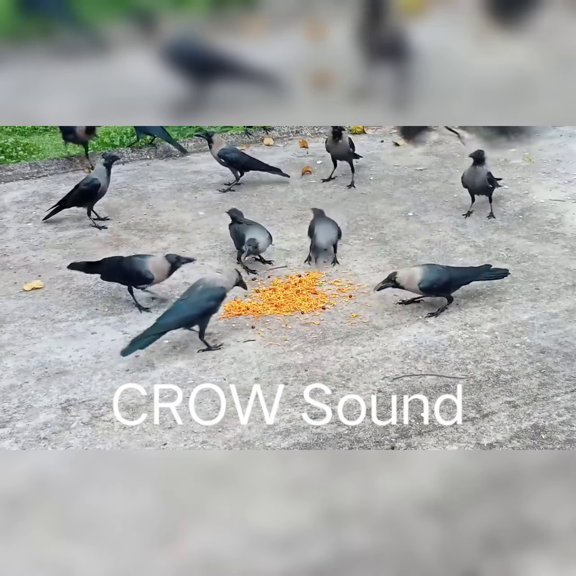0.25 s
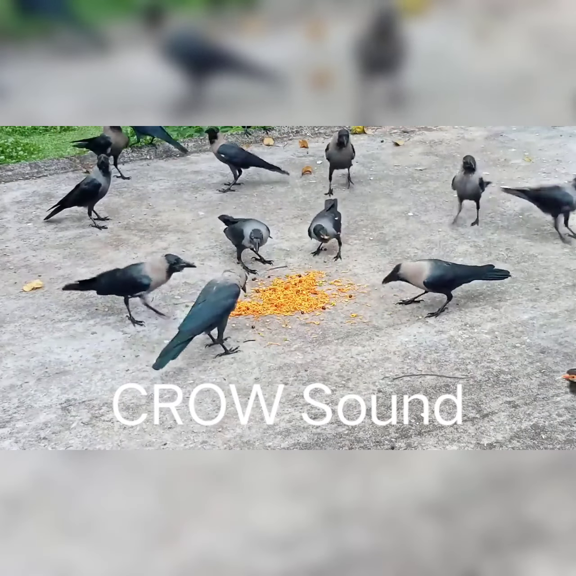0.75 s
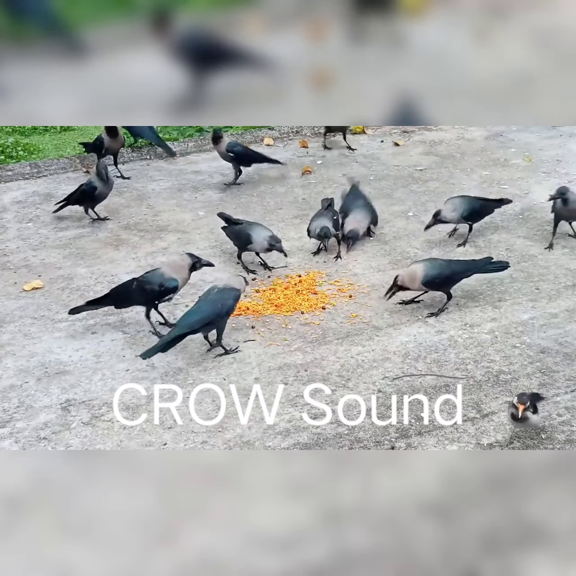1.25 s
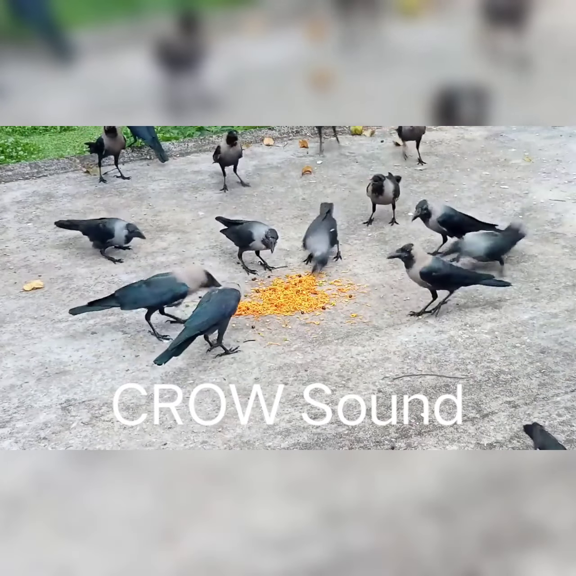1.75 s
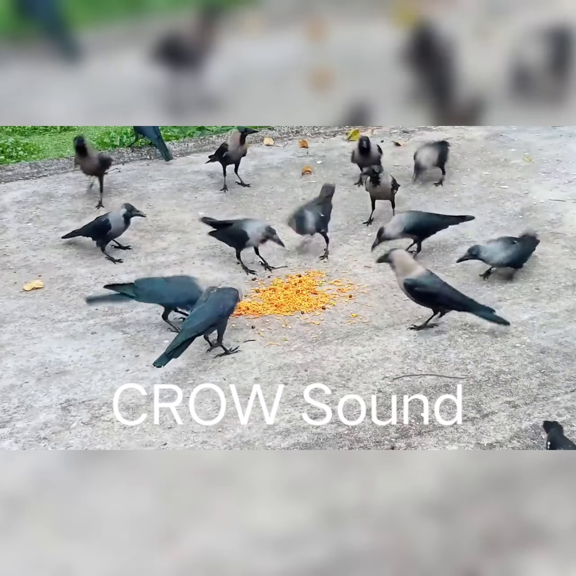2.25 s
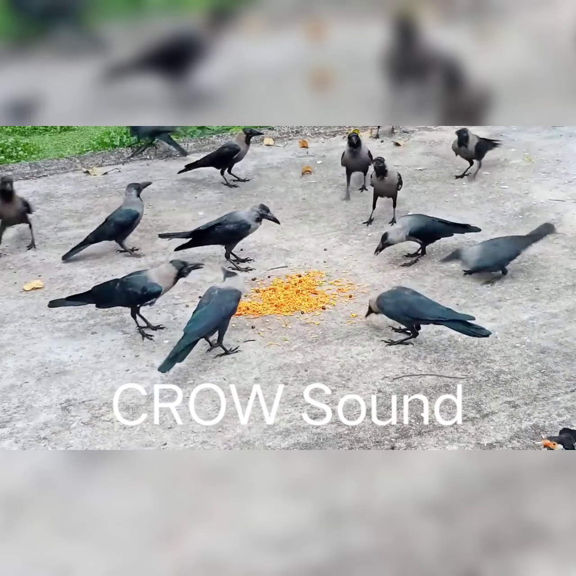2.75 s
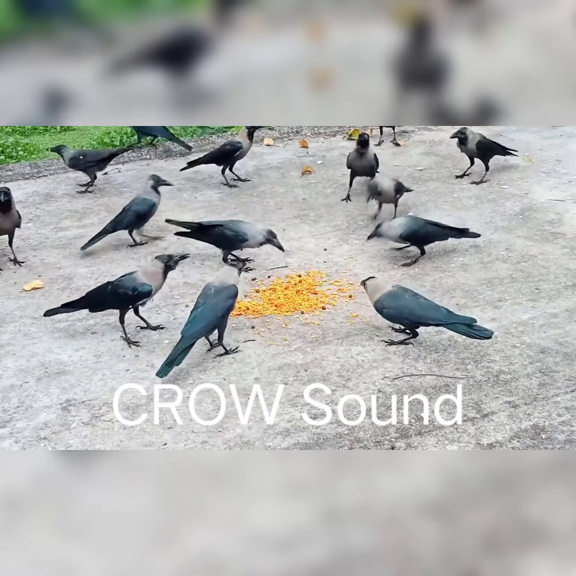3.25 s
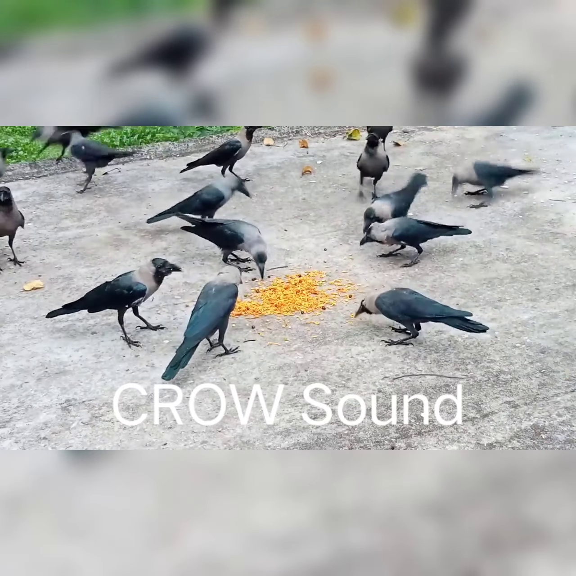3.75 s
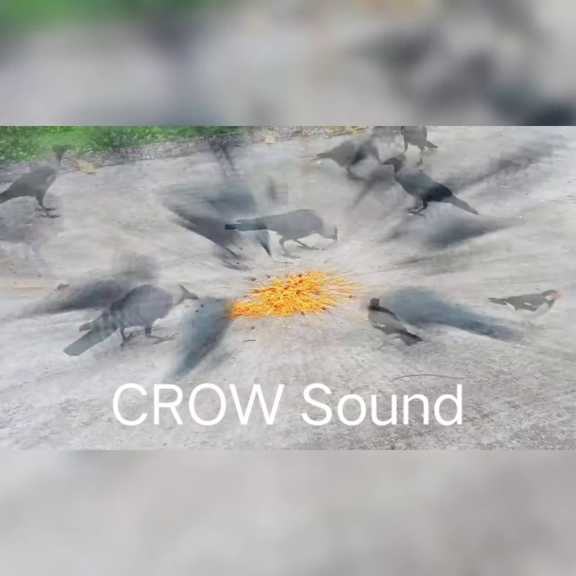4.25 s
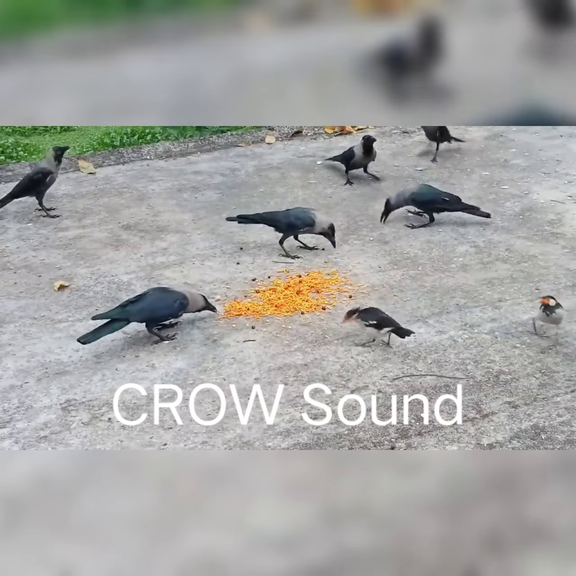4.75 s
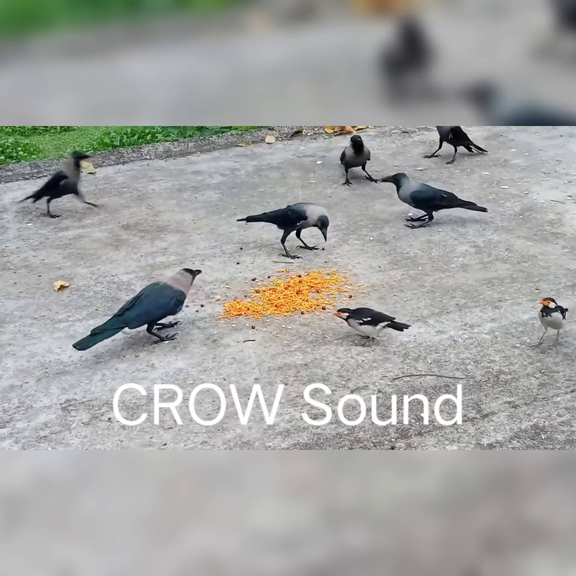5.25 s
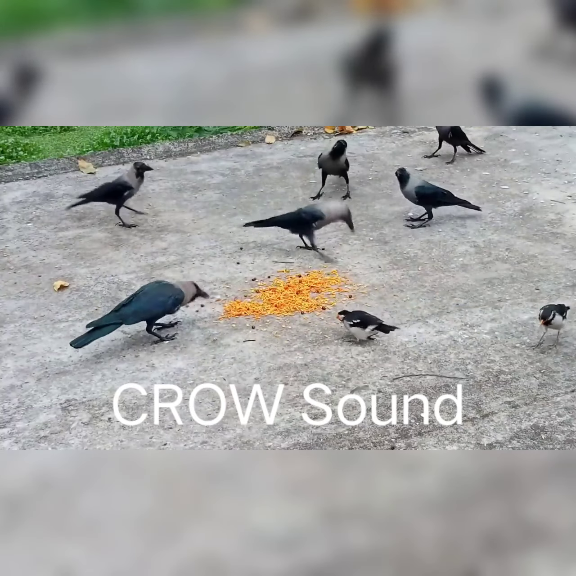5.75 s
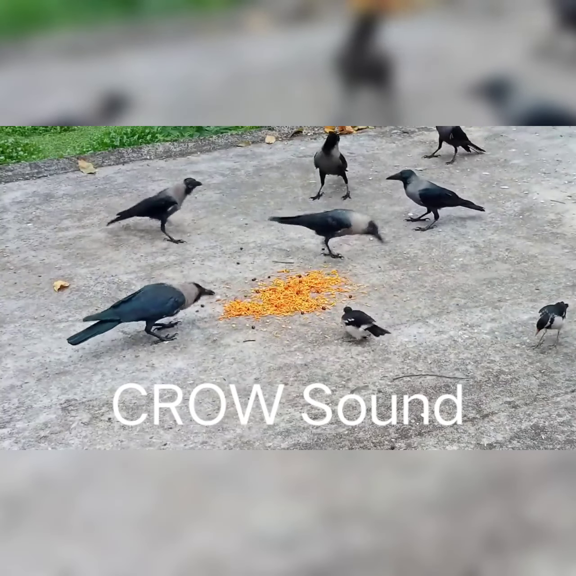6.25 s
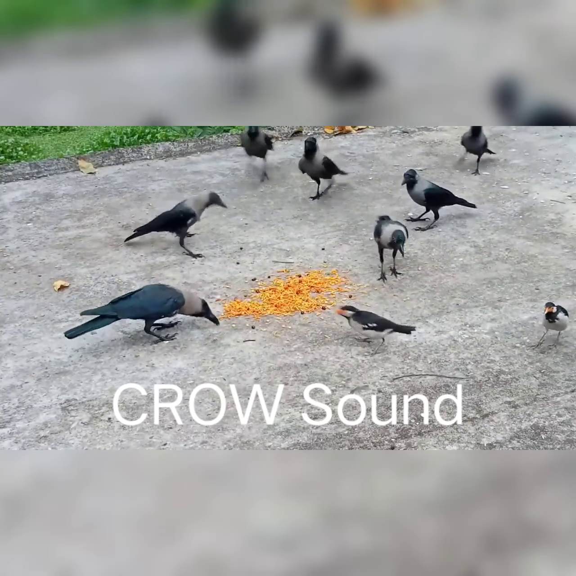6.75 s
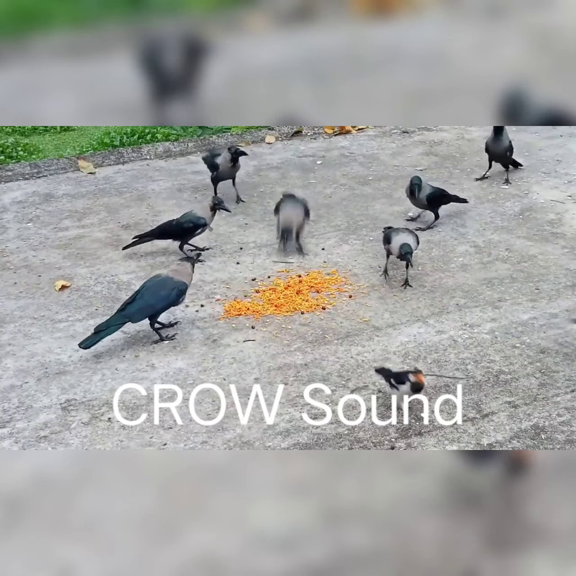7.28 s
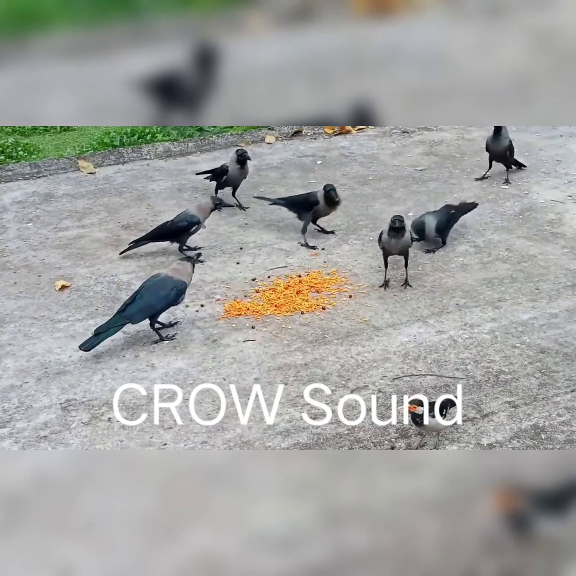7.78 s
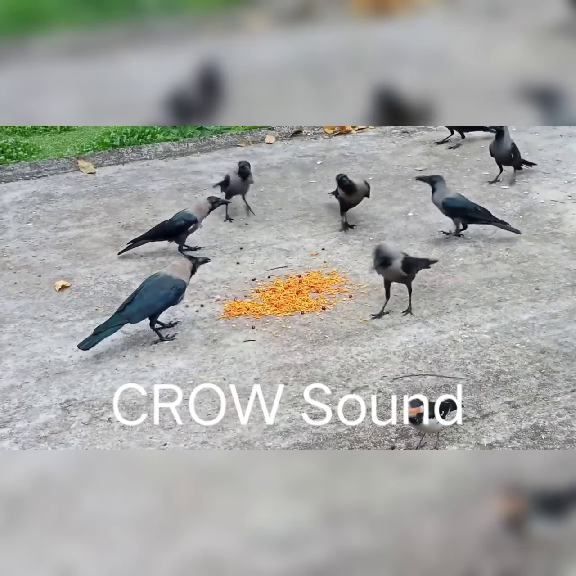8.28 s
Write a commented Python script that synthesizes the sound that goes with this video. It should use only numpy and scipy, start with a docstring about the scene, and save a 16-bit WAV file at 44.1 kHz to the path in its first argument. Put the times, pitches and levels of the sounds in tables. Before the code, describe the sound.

Raspy mid-pitched crow caws crowd together in an open yard, then grow sparse, over quiet outdoor air, small ground ticks and distant bird chirps.

```python
"""Crows squabbling over food

House crows squabble on a concrete yard, cawing harshly and over one another. Each caw is an arching tone
shaken by a fast rasp, shaped by throat and beak, and echoed by the yard. Beaks and claws tap the ground as
short ringing noise bursts, far birds chirp and hoot as gliding whistles, and coloured noise makes the soft
outdoor background, the twitter in the trees and the puffs of wind that bump the microphone."""
import sys
import numpy as np
from scipy import signal
from scipy.fft import rfft, irfft, next_fast_len
from scipy.io import wavfile
from scipy.ndimage import map_coordinates

SR = 44100
rng = np.random.default_rng(int(sys.argv[2]) if len(sys.argv) > 2 else 0)


def transcribe(signal):
    """Save signal, clipped to [-1, 1], as a 16-bit WAV file at the path in sys.argv[1]."""
    frames = np.atleast_2d(signal).T
    limited = np.clip(frames, -1, 1)
    pcm = np.round(limited * 32767).astype(np.int16)
    wavfile.write(sys.argv[1], SR, pcm)


N = 375732  # length of the scene [samples]

# Every caw: (start [s], end [s], top pitch [Hz], pitch sag [share], level before swell and fade [dB],
#  attack [s], pitch swing of the rasp at the start [share], roughness [0 to 1], beak resonance at top pitch [Hz],
#  throat boost [dB], mouth boost [dB], treble boost at top pitch [dB], twang boost [dB])
CAW_CALLS = [ (-.16, 0.093, 579, .09, -18.5, .034, 0.039, 0.4, 2560, -2, -9, -0.5, -9),
             (-.07, 0.229, 501.4, .13, -23, 0.046, 0.025, 0.37, 1850, 3.5, -9, -5, -7),
             (0.509, 0.832, 544.8, 0.16, -25, 0.064, 0.068, 0.31, 2220, 6.5, 6, -2, 9),
             (1.03, 1.31, 488.7, .10, -26.5, .045, 0.018, 0.31, 1900, 8.5, -4.5, 0.5, 3.5),
             (1.416, 1.737, 445.4, 0.14, -26.5, 0.05, 0.019, 0.46, 2380, -11.5, 1.5, 0, 10),
             (1.619, 1.819, 488, 0.054, -26, 0.053, .025, 0.24, 2290, 0.5, -3, 1.5, -9.5),
             (1.643, 1.94, 576.7, .12, -21, 0.082, 0.056, 0.42, 2500, -5, -10.5, 2.5, -11),
             (1.987, 2.238, 442.6, 0.066, -18.5, .03, 0.041, 0.36, 1740, -0.5, 1.5, 3.5, 8),
             (2.012, 2.287, 513.8, .13, -19.5, .04, .049, 0.44, 1844, 2, -5.5, 0.5, -2.5),
             (2.047, 2.341, 525.7, 0.18, -26, .083, 0.017, 0.42, 2400, -0.5, -35, -6, 10),
             (2.851, 3.137, 550.2, 0.11, -23, .06, 0.056, 0.28, 1867, 5, 5.5, 3, 3),
             (3.73, 4.056, 537.5, 0.21, -17.5, 0.088, 0.054, 0.29, 2260, -2, -12.5, -6, 11.5),
             (4.165, 4.486, 527, 0.11, -38.5, 0.074, 0.0094, 0.7, 2330, -1, 3, -1.5, 4),
             (4.456, 4.623, 542.2, 0.13, -20, 0.003, 0.065, 0.56, 1970, 1, -2.5, 2, 7),
             (4.453, 4.682, 490.5, 0.079, -22.5, .0019, 0.013, 0.4, 2030, 1, -2.5, 1.5, -1),
             (5.03, 5.363, 485, 0.12, -54.5, 0.061, 0.067, 0.53, 1640, 1, 5, -0.5, -2.5),
             (6.087, 6.38, 527.8, 0.095, -21.5, .05, 0.041, 0.37, 1970, 2, -2, 1, 8),
             (7.482, 7.779, 490.6, .12, -36.5, 0.056, 0.042, 0.22, 2000, 6.5, -4.5, 1.5, -1),
             (7.831, 8.163, 531.7, 0.18, -21.5, 0.093, 0.032, 0.3, 2200, -0.5, -13, -0.5, 4.5),
             (7.887, 8.211, 470.5, .11, -22, 0.066, 0.0067, 0.28, 2390, 2.5, -5, 1, 4),
             (8.19, 8.475, 517.3, 0.15, -20.5, .035, 0.082, 0.31, 1913, 1.5, -7.5, -0.5, 0)]
# Tone colour of a crow's throat: (frequency [Hz], gain [dB])
THROAT_COLOUR = [(260, -48.5), (450, -19), (605, -20.5), (790, -15.5), (1030, -7.5), (1270, -5.5),
                 (1760, 0.5), (2040, 0), (2950, -15.5), (3630, -25), (4030, -20), (5030, -33.5),
                 (7070, -19), (10900, -35.5), (15500, -40.5)]
# How much of the voice turns to hiss: (frequency [Hz], share of power [0 to 1])
AIRY_SHARE = [(2500, 0), (4200, .08), (7000, .28), (12000, .55)]
# Tone colour of the early copies off hard surfaces: (frequency [Hz], gain [dB])
BOUNCE_COLOUR = [(1000, -13), (2200, -10), (3500, -4), (8000, -2)]
# How long the yard's echo takes to die by 60 dB: (frequency [Hz], time [s])
ECHO_TIMES = [(300, 0.38), (2000, 0.57), (5000, 0.48), (12000, 0.15)]
# Tone colour of the outdoor background: (frequency [Hz], gain [dB])
AIR_COLOUR = [(18, -50), (30, -32), (102, 0.5), (156, -8.5), (197, -4), (369, -12.5), (518, -16),
              (561, -12.5), (767, -17), (1400, -22.5), (1510, -21), (4310, -31.5), (5310, -51.5),
              (6890, -25), (15500, -48.5)]
# Tone colour of twittering in the trees: (frequency [Hz], gain [dB])
TWITTER_COLOUR = [(2000, -18), (3100, -5.5), (3700, -7), (4500, -19.5), (5500, -20), (9000, -28)]
# Flurries of twitter, before a shared trim: (middle [s], half width [s], peak level [dB])
TWITTER_FLURRIES = [(.2, 0.54, -44.5), (1.9, 0.51, -45.5), (2.45, 0.14, -53), (2.8, 0.1, -56),
                    (3.9, 0.38, -47), (8.5, 0.61, -54.5)]
# Beaks and claws on concrete: (time [s], level before the shared tick and knock trims [dB],
#  extra knock [dB], ring [Hz])
PECK_HITS = [(.177, -24, 6, 3460), (.2523, -34.5, -15, 4000), (.508, -24.5, 4, 3450),
             (.6487, -22, 11.5, 3900), (.8464, -34.5, -13, 3270), (2.3554, -36.5, 2, 3200),
             (2.5045, -23, 4, 3500), (2.5832, -30.5, -33, 3260), (3.4068, -33.5, -17.5, 7870),
             (3.477, -30.5, 3.5, 3460), (3.5189, -35.5, 0.5, 2950), (3.6108, -33.5, 0.5, 7400),
             (4.1515, -27, -33.5, 4360), (4.3834, -27.5, -12, 8100), (5.1848, -29.5, -11, 7170),
             (6.5176, -25.5, 13, 3700), (6.8346, -37.5, -2.5, 3150), (7.1092, -41.5, -20.5, 7350),
             (7.34, -43, 13, 6850)]
# Tone colour of the hard tick: (frequency [Hz], gain [dB])
TICK_COLOUR = [(1470, -29), (2500, -6), (3690, -2.5), (4970, -19), (6950, -0.5), (8880, -9), (10100, -13.5),
               (15500, -11.5)]
# Tone colour of the dull knock: (frequency [Hz], gain [dB])
KNOCK_COLOUR = [(290, -46.5), (500, -13), (884, -9), (1360, -3.5), (2060, 5), (3000, -17.5), (3900, -52.5),
                (6600, -120)]
# Small birds far off: (start [s], end [s], pitch [Hz], glide [share of pitch], level before mixing [dB])
FAR_CHIRPS = [(.245, .43, 3700, -0.13, -65), (.293, .467, 4600, -0.029, -62.5),
              (.46, .521, 3330, -.04, -55), (.642, .675, 3680, -0.067, -50), (.74, .882, 3440, -.06, -51.5),
              (1.262, 1.416, 3235, 0.057, -58), (3.685, 3.768, 3575, 0.1507, -56),
              (4.278, 4.466, 4380, -0.11, -64)]
# Low hoots far off: (start [s], end [s], pitch [Hz], glide [share of pitch], level before mixing [dB])
FAR_HOOTS = [(2.344, 2.622, 790, -0.11, -68.5), (2.641, 2.852, 690, -0.15, -62.5),
             (3.567, 3.798, 705, 0.052, -66.5), (3.938, 4.117, 695, -.08, -60),
             (4.225, 4.393, 620, -0.061, -61.5), (5.502, 5.688, 720, 0.018, -67.5),
             (5.92, 6.132, 800, 0.064, -65.5), (7.088, 7.614, 697, -0.13, -66.5),
             (7.411, 7.47, 965, .17, -66.5)]
# Strength of the breeze at the microphone, before a shared trim: (time [s], level [dB])
BREEZE = [(4.42, -60), (4.55, -40.5), (4.85, -54), (5.12, -29), (5.26, -47), (5.65, -45), (6.02, -55.5),
          (6.6, -46.5), (6.75, -71)]
# Tone colour of the breeze's low eddies: (frequency [Hz], gain [dB])
EDDY_COLOUR = [(15, -47), (25, -30), (54, 3), (97, 8.5), (237, -12.5), (389, -21), (450, -50), (580, -67),
               (990, -120)]
# Sharper puffs, before a shared trim: (middle [s], length [s], level [dB])
WIND_PUFFS = [(4.472, .035, -40), (4.629, .08, -41.5), (4.931, 0.043, -36), (5.13, 0.1, -37.5),
              (5.208, .03, -36.5), (5.307, .04, -40), (5.422, 0.044, -41), (5.497, 0.044, -43.5),
              (6.471, .04, -41.5), (6.644, 0.071, -39.5), (7.855, 0.045, -49), (8.422, 0.056, -38),
              (8.488, .034, -46)]
# Tone colour of a puff: (frequency [Hz], gain [dB])
PUFF_COLOUR = [(25, -50), (55, -7), (100, 11.5), (170, -4.5), (300, -18.5), (600, -69.5), (1200, -120)]

TOP_HZ = 15700  # nothing sounds above this
RASP_HZ, RASP_SPREAD = 75.54, 0.021  # average flutter rate, and its scatter from caw to caw [share]
FADE_DB_PER_SAG, STEADY_SAG = 98, .08  # failing pressure lowers pitch and level; at this sag the level holds
ROUGH_DRIFT, HISS_SHARE = .38, .7  # phase drift [radians] and hiss, each per unit of roughness
BEAK_DB, BEAK_OCTAVES = 8.5, 0.11  # height and width of the beak resonance
HOLLOW_HZ, HOLLOW_SHARE = 2980, 0.13  # a twangy bird has a dip below its twang [share of the twang dB]
RELEASE_S = .056  # the final plunge
TWANG_HZ, RING_HZ, RING_DB = 3930, 7300, 3.5  # upper resonances at top pitch; they sink with the pitch
FIZZ_HZ, FIZZ_DB, FIZZ_GROWS = 8220, -2, 1  # top octave: edge, gain, and extra dB per dB of treble
DULL_DB_PER_DROP = 5  # treble lost per share of pitch below the top
AIR_DB, CHATTER_DB = -53.5, -68  # average background; twitter between flurries, before its trim
STEP_DB, STEP_SPREAD_DB = -44, 3  # faint claw ticks: average level before trims, and scatter
STEP_KNOCK_DB, STEP_RING_HZ = -9, 7200  # their extra knock and their ring


def amp(db):
    """Turn decibels into a plain multiplier."""
    return 10 ** (np.asarray(db) / 20)


def unit(x):
    """Scale a sound to an average (rms) strength of 1."""
    return x / np.sqrt(np.mean(x ** 2) + 1e-20)


def along(points, hz):
    """Read between (Hz, value) points, with frequency on a log axis."""
    f, v = np.transpose(points)
    return np.interp(np.log(hz + 1), np.log(f + 1), v)


def curve(rows):
    """Turn (s, value) rows into one value per sample."""
    return np.interp(np.arange(N) / SR, *np.transpose(rows))


def wobble(rate, size):
    """A smooth random curve through `rate` random points a second."""
    return map_coordinates(rng.standard_normal(size + 4), [np.arange(size) * rate / SR])


def bell(hz, centre_hz, octaves):
    """A resonance hump of height 1."""
    return np.exp(-.5 * (np.log2((hz + 1) / centre_hz) / octaves) ** 2)


def coloured(x, gain_db):
    """Filter x by a dB gain that depends on frequency, with no sound before its cause."""
    m = 2 * next_fast_len(len(x) // 2 + 2048)
    gain = amp(gain_db(np.fft.rfftfreq(m, 1 / SR)))
    # folding the cepstrum gives the filter its minimum-phase form
    cepstrum = irfft(np.log(gain + 1e-6))
    cepstrum[1:m // 2] *= 2
    cepstrum[m // 2 + 1:] = 0
    return irfft(rfft(x, m) * np.exp(rfft(cepstrum)), m)[:len(x)]


def noise(spectrum, size):
    """Random noise with a given tone colour, at rms 1."""
    return unit(coloured(rng.standard_normal(size), lambda hz: along(spectrum, hz)))


def add(track, s, x):
    """Mix x into the track from time s on, cutting what falls outside."""
    i = round(s * SR)
    x = x[max(-i, 0):max(N - i, 0)]
    track[max(i, 0):][:len(x)] += x


def syrinx(pitch, tract_db, rasp_hz, swing, rough, throb=0.38, jitter=0.0055, unsteady=0.0983,
           fundamental_db=-11, widest=5.14, uneven_db=5.0):
    """A harmonic tone heard through the tract; a slower flutter shakes its pitch and size, and air hisses along."""
    n = len(pitch)
    flutter = 2 * np.pi * np.cumsum(rasp_hz * (1 + unsteady * wobble(71.24, size=n))) / SR
    phase = 2 * np.pi * np.cumsum(pitch) / SR
    pitch_shake = swing * np.sin(flutter) + jitter * wobble(303.1, size=n)
    shake = 2 * np.pi * np.cumsum(pitch * pitch_shake) / SR
    height = pitch / pitch.max()
    tone = np.zeros(n)
    for k in range(1, 33):  # k is the number of the partial
        if k > 2:
            db = tract_db(k * pitch, height)
        else:  # the throat keeps the two lowest partials strong or weak however far the pitch falls
            db = tract_db(k * pitch.max()) + fundamental_db * (k == 1)
        if k > 5:  # high partials are hoarse: each comes and goes by itself
            db = db + uneven_db * wobble(6.15, size=n) + 1.53 * wobble(260, size=n) - 1.5
        pulsing = 1 + throb * np.sin(flutter + rng.normal(1, .9))
        # higher partials shake wider, up to a limit
        wander = shake + ROUGH_DRIFT * rough * wobble(239.54, size=n)
        drift = rng.uniform(0, 2 * np.pi) + min(k, widest) * wander
        tone += amp(db) * pulsing * np.cos(k * phase + drift) * (k * pitch < TOP_HZ)

    def voiced_db(hz):
        """Power left to the tone once part of it has turned to hiss."""
        return 10 * np.log10(1 - along(AIRY_SHARE, hz))

    def hiss_db(hz):
        """Power of the hiss, from roughness and from airiness."""
        return 10 * np.log10((HISS_SHARE * rough) ** 2 + along(AIRY_SHARE, hz))

    hiss = unit(coloured(rng.standard_normal(n), tract_db)) * (1 + throb * np.sin(flutter + 1))
    return unit(coloured(unit(tone), voiced_db) + coloured(hiss, hiss_db))


def caw(length, top_hz, sag, attack, swing, rough, beak_hz, throat_db, mouth_db, treble_db, twang_db):
    """One caw: pitch scoops up, sags, and plunges as pressure is let go; level and brightness follow."""
    t = np.arange(int(length * SR)) / SR
    held = t / (length - RELEASE_S)
    letting_go = np.clip((t - length + RELEASE_S) / RELEASE_S, 0, 1)
    scoop = .21 * np.exp(-t / (.5 * attack))
    droop = sag * np.clip((held - .25) / .75, 0, None) ** 2
    pitch = top_hz * (1 - scoop - droop) * (1 - .44 * letting_go ** 1.4)

    def above(hz, edge_hz):
        """A soft step from 0 to 1 around an edge."""
        return (1 + np.tanh(6 * np.log((hz + 1) / edge_hz))) / 2

    def tract_db(hz, height=1):
        """Shared throat plus this bird's resonances and brightness; height is the pitch over its top."""
        sink = height ** 0.55
        throat = throat_db * bell(hz, 2 * top_hz, 0.099)
        mouth = mouth_db * bell(hz, 1500, 0.13)
        beak = BEAK_DB * bell(hz, beak_hz * sink, BEAK_OCTAVES)
        twang = bell(hz, TWANG_HZ * sink, 0.095) - HOLLOW_SHARE * bell(hz, HOLLOW_HZ, 0.24)
        ring = RING_DB * bell(hz, RING_HZ * sink, 0.03)
        treble = (treble_db - DULL_DB_PER_DROP * (1 - height)) * above(hz, 2940)
        fizz = (FIZZ_DB + FIZZ_GROWS * treble_db) * above(hz, FIZZ_HZ)
        return along(THROAT_COLOUR, hz) + throat + mouth + beak + twang_db * twang + ring + treble + fizz

    rise = np.sin(np.pi / 2 * np.clip(t / attack, 0, 1)) ** 2
    swell = rise * np.clip((length - t) / 0.01205, 0, 1)
    rasp_hz = RASP_HZ * (1 + RASP_SPREAD * rng.normal())
    voice = syrinx(pitch, tract_db, rasp_hz, swing * (1 - 0.28 * held ** 2), rough)
    fade_db = FADE_DB_PER_SAG * (STEADY_SAG - sag)
    return voice * swell * amp(fade_db * (held - 0.7669) - 14.4 * letting_go)


def bounced(x, count=7):
    """Concrete and kerbs add a few early copies, which comb the treble differently on each call."""
    taps = np.zeros(SR // 50)
    places = rng.integers(SR // 700, len(taps), count)
    taps[places] = rng.choice([-1, 1], count) / np.sqrt(count)
    copies = signal.fftconvolve(x, taps)[:len(x)]
    return x + coloured(copies, lambda hz: along(BOUNCE_COLOUR, hz))


def crows():
    """All the caws of the flock, each with its own early copies off the ground."""
    track = np.zeros(N)
    for start, end, top_hz, sag, db, *manner in CAW_CALLS:
        voice = caw(end - start, top_hz, sag, *manner)
        voice = np.pad(voice, (0, SR // 20))  # room for the copies to ring out
        add(track, start, amp(db) * unit(bounced(voice)) * np.std(voice))
    return track


def yard(x, gap=0.012):
    """Walls and trees answer, building up over a short gap in seconds; the highest treble dies first."""
    hz, t, z = signal.stft(rng.standard_normal(SR), SR, nperseg=256)
    dying = amp(-60 * t / along(ECHO_TIMES, hz)[:, None])
    tail = signal.istft(z * dying, SR, nperseg=256)[1]
    tail *= np.clip(np.arange(len(tail)) / SR / gap, 0, 1)
    tail = coloured(tail / np.linalg.norm(tail), lambda hz: along([(2500, -0.5), (8000, 6.5)], hz))
    return signal.fftconvolve(x, tail)[:N]


def background(chatter_db=-2, restless_db=4.0):
    """Noise for distant traffic and leaves, and a restless twitter in the trees that swells in flurries."""
    t = np.arange(N) / SR
    air = amp(AIR_DB + wobble(5, size=N)) * noise(AIR_COLOUR, size=N)
    chatter = amp(CHATTER_DB)
    for s, width, db in TWITTER_FLURRIES:
        chatter = chatter + amp(db) * np.exp(-((t - s) / width) ** 2)
    flicker = amp(chatter_db + restless_db * wobble(45, size=N))
    return air + chatter * flicker * noise(TWITTER_COLOUR, size=N)


def pecks(tick_db=-7, knock_db=-12, tick_t60=0.044, knock_t60=0.055, count=18):
    """A hard tick with a brief ring of the beak, over a duller knock; faint steps fall at random moments."""
    track, t = np.zeros(N), np.arange(SR // 10) / SR
    steps = []
    for _ in range(count):
        step_s, step_db = rng.uniform(0, N / SR), rng.normal(STEP_DB, STEP_SPREAD_DB)
        steps.append((step_s, step_db, STEP_KNOCK_DB, STEP_RING_HZ))
    for s, db, body_db, ring_hz in PECK_HITS + steps:
        ringing = unit(coloured(noise(TICK_COLOUR, size=len(t)), lambda hz: 8 * bell(hz, ring_hz, 0.3)))
        tick = ringing * amp(tick_db - 60 * t / tick_t60)
        knock = noise(KNOCK_COLOUR, size=len(t)) * amp(knock_db + body_db - 60 * t / knock_t60)
        add(track, s, amp(db) * (tick + knock))
    return track


def whistles(calls, arch, waver, overtone_db):
    """Thin tones that glide along a shallow arch, swelling and fading."""
    track = np.zeros(N)
    for start, end, middle_hz, glide, db in calls:
        u = np.linspace(-.5, .5, int((end - start) * SR))  # place within the call
        hz = middle_hz * (1 + glide * u - arch * (2 * u) ** 2 + waver * wobble(300, size=len(u)))
        phase = 2 * np.pi * np.cumsum(hz) / SR
        tone = np.sin(phase) + amp(overtone_db) * np.sin(3 * phase)
        swell = np.sqrt(np.abs(np.cos(np.pi * u)))
        add(track, start, amp(db) * unit(tone * swell))
    return track


def far_birds():
    """Wavering, nearly pure chirps, and smoother low hoots with more overtone."""
    chirps = whistles(FAR_CHIRPS, arch=.015, waver=0.0184, overtone_db=-55)
    hoots = whistles(FAR_HOOTS, arch=.04, waver=.009, overtone_db=-18)
    return chirps + hoots


def wind(eddy_db=-4, puff_db=-1, lumps_db=4, lumps_per_s=26):
    """The breeze breaks into low eddies at the microphone, with a few sharper puffs."""
    t = np.arange(N) / SR
    blowing = (t > BREEZE[0][0]) & (t < BREEZE[-1][0])
    strength = amp(curve(BREEZE) + eddy_db + lumps_db * wobble(lumps_per_s, size=N))
    track = blowing * strength * noise(EDDY_COLOUR, size=N)
    for s, length, db in WIND_PUFFS:
        n = int(length * SR)
        puff = noise(PUFF_COLOUR, size=SR // 4)[-n:] * signal.windows.hann(n)
        add(track, s - length / 2, amp(db + puff_db) * unit(puff))
    return track


def scene():
    """Near birds are nearly dry, far ones carry more of the yard's echo; wind and background have no echo."""
    near, far = crows() + pecks(), far_birds()
    near_mix = near + amp(-17.5) * yard(near)
    far_mix = amp(9.5) * far + yard(far)
    return (near_mix + far_mix + wind() + background())[None]


def record(dry):
    """The recorder keeps nothing above its band limit."""
    m = next_fast_len(N + SR // 4)
    kept = np.fft.rfftfreq(m, 1 / SR) < TOP_HZ
    return irfft(rfft(dry, m) * kept, m)[..., :N]


dry = scene()
out = record(dry)
transcribe(out)
```